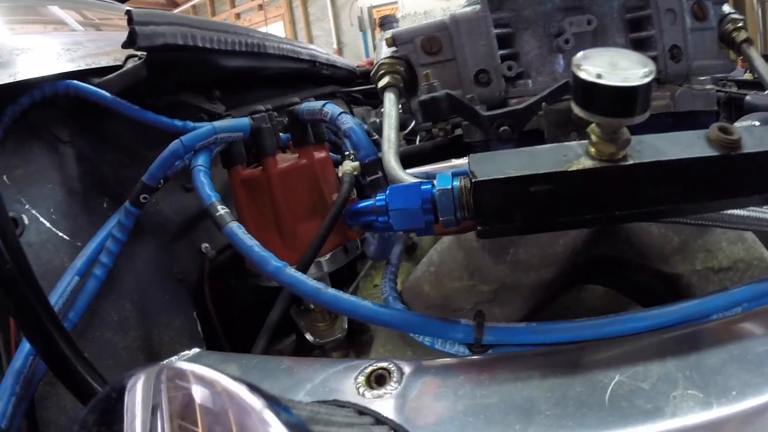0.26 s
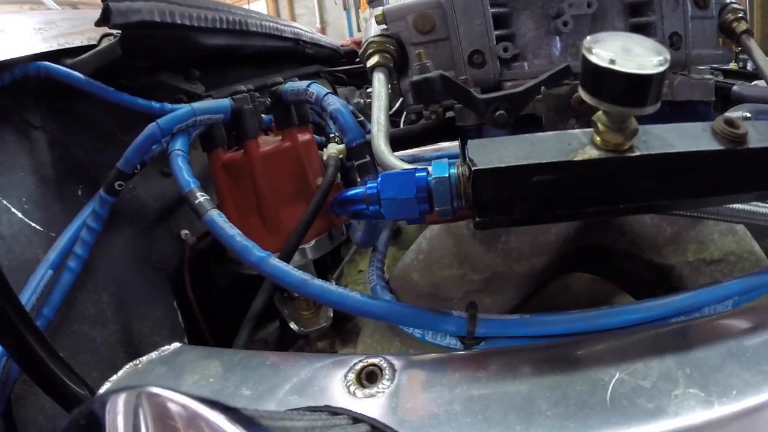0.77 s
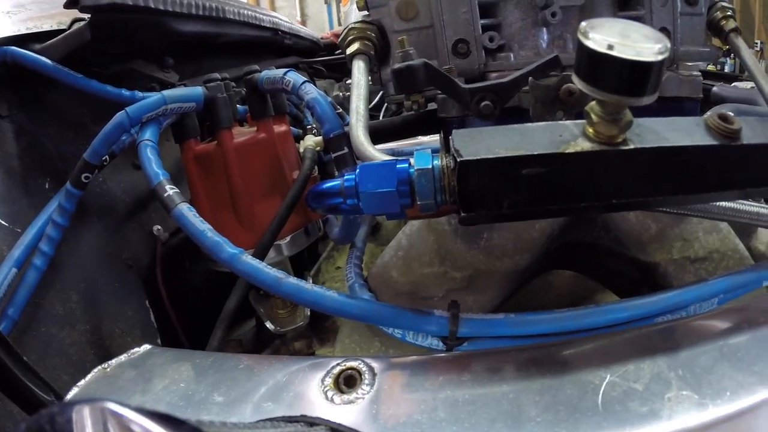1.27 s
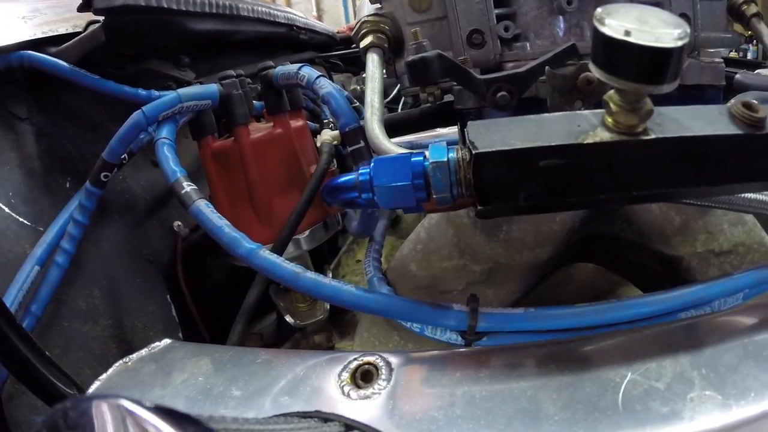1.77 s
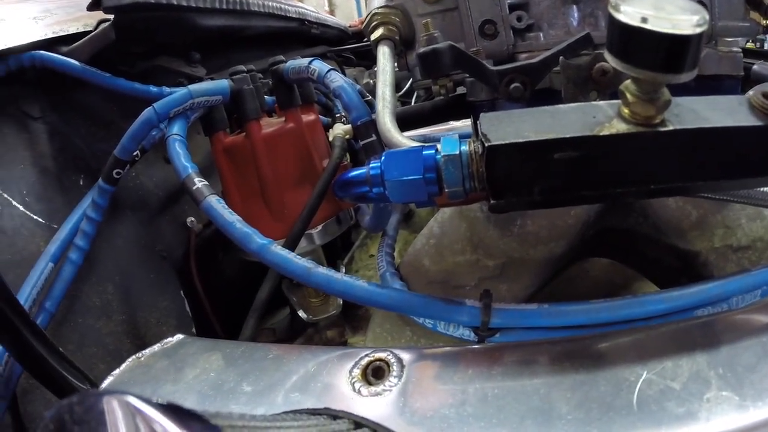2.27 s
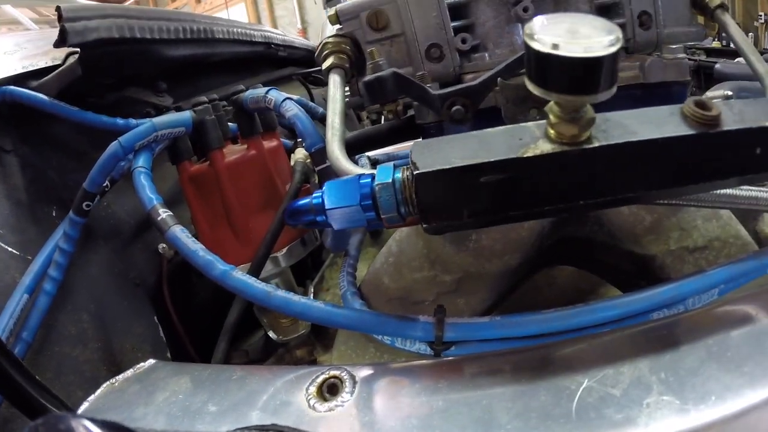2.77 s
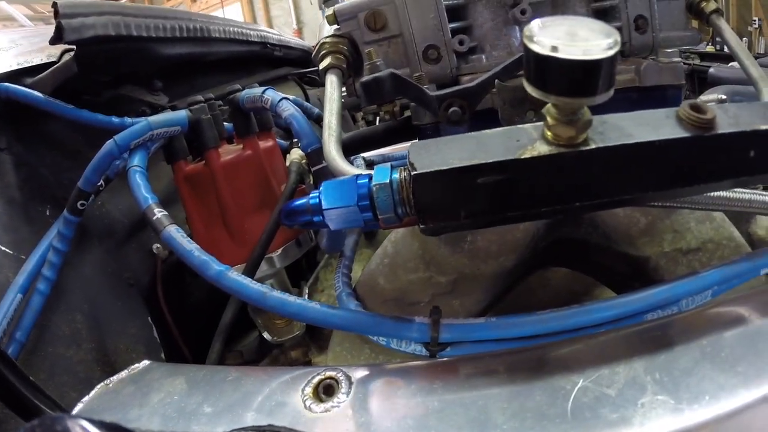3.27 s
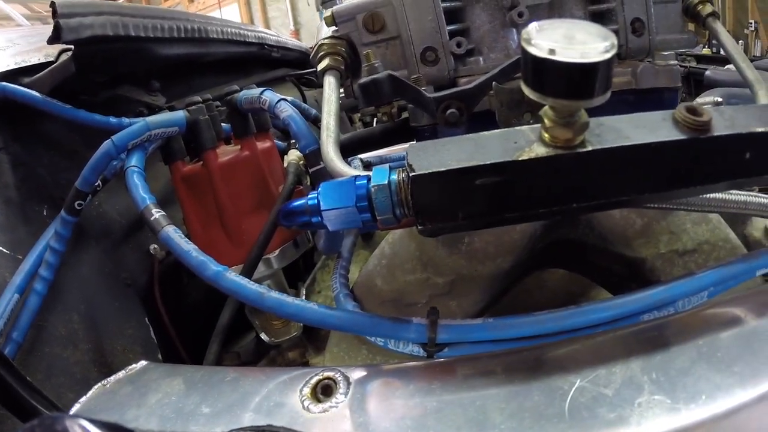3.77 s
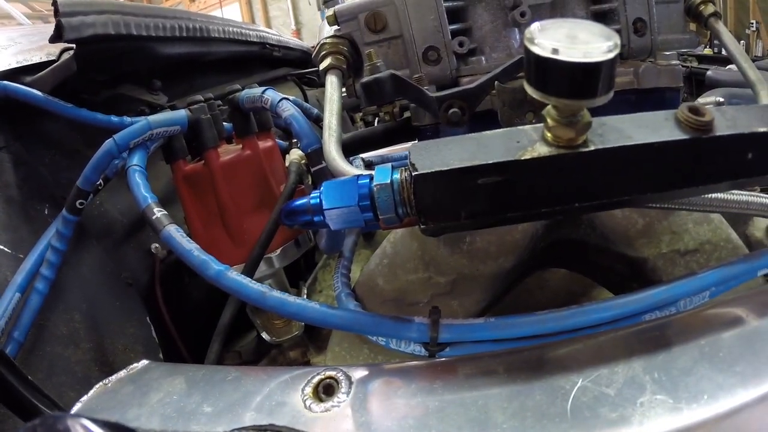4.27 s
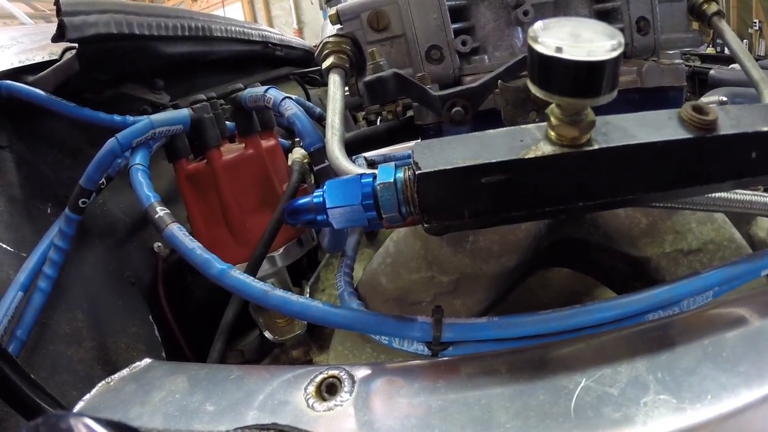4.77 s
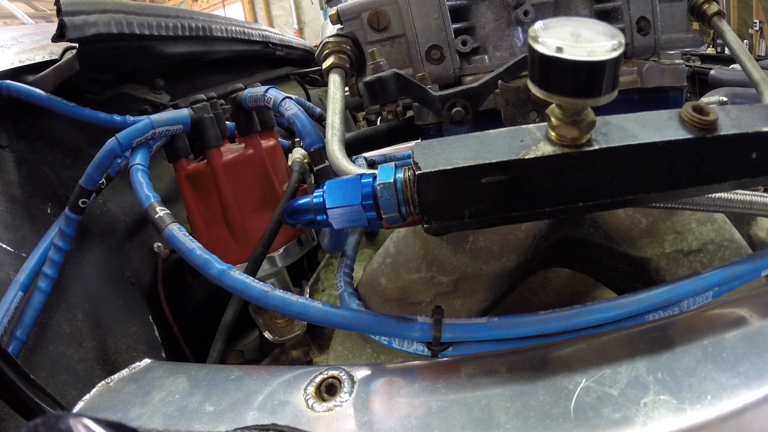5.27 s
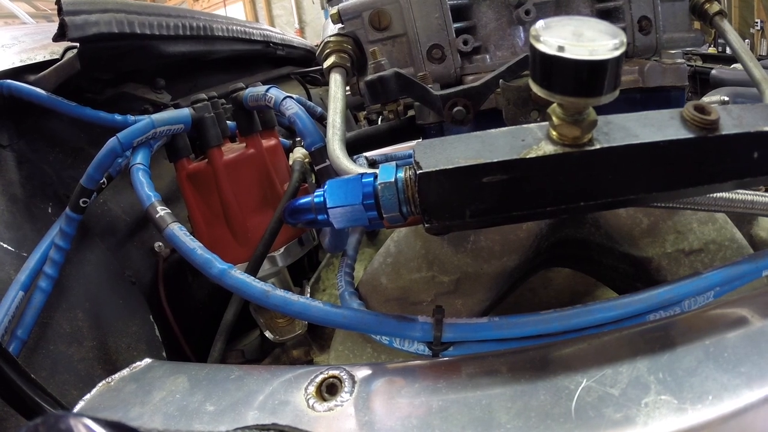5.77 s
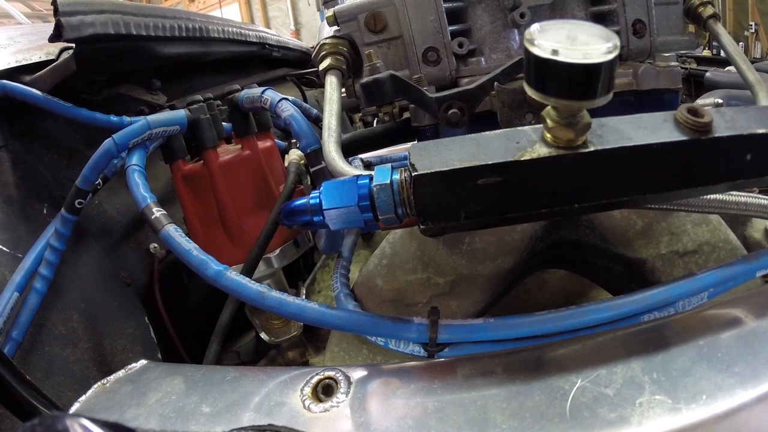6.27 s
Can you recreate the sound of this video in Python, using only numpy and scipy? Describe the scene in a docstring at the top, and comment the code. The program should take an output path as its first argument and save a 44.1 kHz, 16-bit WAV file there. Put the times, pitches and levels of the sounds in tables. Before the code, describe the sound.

An electric fuel pump is already running at the start and continues without a break for about six and a half seconds, heard close over the bay of a stopped car engine. The main sound is a low to mid-pitched hum with a fast throb, constant in pitch and nearly constant in level. A thin, slightly wavering metallic whine and a light buzz sit above it, along with the soft hiss of fuel in the rail. Tiny high metal ticks repeat so quickly that they blend into the buzz. During the first 2.5 seconds the tone changes colour gently as the hand-held microphone moves, with a quicker shift at about 2.5 seconds, after which it stays settled. Underneath, two faint deep drones swell and ebb slightly within the soft rumble of the garage.

```python
"""Fuel pump in a garage

An electric fuel pump runs steadily, heard over the bay of a stopped engine. Its shaft turns
41 times a second and drives a throbbing hum, a thin whine, a buzz and two small ticks a turn,
while fuel hisses in the rail. The colour changes as the hand-held microphone shifts between
three spots. Two faint drones and the rumble of the garage lie underneath."""
import sys
import numpy as np
from scipy import signal
from scipy.fft import rfft, irfft, next_fast_len
from scipy.io import wavfile

SR = 44100
rng = np.random.default_rng(int(sys.argv[2]) if len(sys.argv) > 2 else 0)


def pcm_store(signal):
    """Save signal as 16-bit PCM."""
    levels = np.round(np.clip(np.atleast_2d(signal), -1, 1) * 32767)
    wavfile.write(sys.argv[1], SR, levels.astype(np.int16).T)


N = 287532
TIME = np.arange(N) / SR
SHAFT_HZ = 40.94  # an "order" is a multiple of this speed

# path of the microphone: (time [s], position [spot number, clipped to 0-2])
MIC_PATH = [(0, 0.38), (.45, 0.2), (.9, 0.4), (1.1, 0.61), (2.45, 0.92), (2.7, 3.4), (6.52, 2.54)]
# strong partials that carry the hum, each snapped to the nearest order: (frequency [Hz], level [dB])
HUM_PEAKS = [(161.5, -42.5), (285.3, -41.5), (328.4, -42), (366.1, -49), (452.2, -45), (489.9, -47.5),
             (613.7, -51), (942.1, -55.5), (985.1, -51.5), (1147, -55.5), (1184, -50.5), (1270, -55.5),
             (1308, -48), (1394, -55.5)]
# the bed of weaker hum orders: (frequency [Hz], base level per order [dB])
HUM_BED = [(82, -63), (123, -53), (240, -58.5), (410, -51.5), (550, -65), (900, -61), (1080, -61),
           (1430, -56.5), (1550, -66), (1750, -73)]
# orders that all but cancel in the pump body: (order [multiple of shaft speed])
CANCELLED_ORDERS = [27, 33]
# a ring of the pump mount holds back nearby orders: (frequency [Hz], half width [Hz], delay [turns])
MOUNT_RING = (376.5, 33.5, .42)
# a short echo off the bodywork ripples the hum: delay [s], (depth at spots 0, 1, 2 [dB per kHz])
ECHO_S, ECHO_DB_PER_KHZ = 0.001204, [-0.1, 0.9, -0.76]
# high orders that sing out as the whine: (order [multiple of shaft speed])
WHINE_ORDERS = [50, 54, 56, 62, 65, 75, 78, 81, 85, 95, 96, 103, 109, 111, 113, 124]
# the buzz between and above the whine: (frequency [Hz], base level per order [dB])
BUZZ_SPECTRUM = [(1700, -66), (2100, -73.5), (2400, -78), (3200, -72), (4500, -71.5), (5300, -75.5),
                 (7000, -79), (9000, -87.5), (12000, -90.5)]
# fuel rushing through pump and rail: (frequency [Hz], relative level [dB])
HISS_SPECTRUM = [(150, -8), (260, 2), (550, 0), (780, -6), (1300, -6), (1700, -12), (2400, -12),
                 (4500, -13.5), (5500, -19), (7700, -17.5), (9000, -22.5), (10300, -22), (12500, -30),
                 (15000, -27.5)]
# rings of the rail and its fittings: (frequency [Hz], width [Hz], boost at spots 0, 1, 2 [dB])
RAIL_RINGS = [(3350, 210, 3.5, 4, 1.5), (3880, 99, 5, -6, 2.5), (4550, 400, -7, 7.5, 2.5),
              (4970, 160, 9, -1, 2.5), (5580, 150, 13.5, 8.5, 2.5), (6050, 170, 10, 5, 5),
              (6460, 150, 3, 4.5, 4.5), (6880, 84, 2, 6.5, 11), (7230, 160, 4, 4.4, 0.5),
              (8130, 200, 7, 15.5, 9), (8720, 260, 12, 0, 6), (9500, 130, 8, 1, 9), (9730, 240, 13, 9, 8),
              (10700, 250, 3, 7, 0), (11620, 370, 12, -1, 6), (13500, 280, 4, 9, 7)]
# metal contacts in each turn: (shaft angle [turns], relative level [dB])
TICK_CONTACTS = [(.02, -2.5), (.77, -1.5)]
# the ring of a tick: (frequency [Hz], relative level [dB], time to fade 60 dB [s])
TICK_MODES = [(9600, -2, 0.012), (9750, -1, 0.0095), (10160, 1, 0.0068), (10600, -16, .003),
              (14500, -11, .001)]
# fader moves of the drones: (time [s], level near 56 Hz [dB], level near 83 Hz [dB])
DRONE_LEVELS = [(0.15, -52.5, -56), (1.93, -55.5, -59.5), (3.53, -52, -51.5), (4.21, -55, -61),
                (5.53, -61, -65), (5.58, -57, -62), (6.4, -54, -69)]
# fuzzy low resonances of the garage: (frequency [Hz], width [Hz], level [dB])
ROOM_BOOMS = [(67.1, 1.8, -66), (135.9, 13.3, -52.5), (191.4, 14, -59)]
# garage rumble: (frequency [Hz], relative level [dB])
RUMBLE_SPECTRUM = [(8, -17), (22, -6), (45, -7), (100, -3), (130, -12), (170, 7), (230, -18), (400, -4),
                   (1500, -27)]


def amp(db):
    """Decibels to gain."""
    return 10 ** (np.asarray(db) / 20)


def unit_rms(x):
    """Scales a signal to an rms of 1."""
    return x / np.sqrt(np.mean(x ** 2) + 1e-20)


def automation(rows, column=1):
    """One column of a timed table, interpolated to every sample."""
    rows = np.array(rows)
    return np.interp(TIME, rows[:, 0], rows[:, column])


def spectrum_db(points, hz):
    """The level of an EQ curve at hz, interpolated on a log-frequency axis."""
    point_hz, db = np.transpose(points)
    return np.interp(np.log(hz + 1), np.log(point_hz), db)


def noise(gain):
    """Noise of rms 1, shaped by the function gain(Hz)."""
    size = next_fast_len(N)
    hz = np.fft.rfftfreq(size, 1 / SR)
    return unit_rms(irfft(rfft(rng.standard_normal(size)) * gain(hz), size)[:N])


def drift(rate_hz):
    """A smooth random modulator of rms 1, moving at up to about rate_hz."""
    return noise(lambda hz: 1 / (1 + (hz / rate_hz) ** 4))


def random_phases(count):
    """Phasors of length 1 at random angles."""
    return np.exp(2j * np.pi * rng.random(count))


def wavetable(orders, phasors, turns, size=8192):
    """One turn's vibration, built from its orders and looped at the shaft's angle."""
    spectrum = np.zeros(size // 2 + 1, complex)
    spectrum[orders] = phasors * size / np.sqrt(2)
    one_turn = np.resize(irfft(spectrum), size + 1)
    return np.interp(turns % 1 * size, np.arange(size + 1), one_turn)


def shaft_turns(flutter_hz=.03, wander_hz=.02, start_turns=.015):
    """Shaft angle in turns; the speed is steady but for slight flutter and slow wander under load."""
    speed_hz = SHAFT_HZ + flutter_hz * drift(rate_hz=9) + wander_hz * drift(rate_hz=.7)
    return start_turns + np.cumsum(speed_hz) / SR


def mic_crossfade(spots=3):
    """Each spot's share of the mix as the microphone moves; the shares sum to 1."""
    position = np.clip(automation(MIC_PATH), 0, spots - 1)
    return np.maximum(1 - abs(position - np.arange(spots)[:, None]), 0)


def hum(turns, shares, load_peak_turns=.68, stroke_db=2.5, cancel_db=-12, scatter_db=.76, waver=.023):
    """The low orders swell where the rotor is loaded most; the mounts smear them around the turn."""
    orders = np.arange(2, 44)
    hz = orders * SHAFT_HZ
    db = spectrum_db(HUM_BED, hz) + stroke_db * (orders % 4 == 0)  # four fuel strokes a turn
    db += cancel_db * np.isin(orders, CANCELLED_ORDERS)
    for peak_hz, peak_db in HUM_PEAKS:
        db[orders == round(peak_hz / SHAFT_HZ)] = peak_db
    # the low orders keep a throb, the high ones arrive anywhere in the turn
    smear = np.interp(orders, [12, 20], [.15, .5]) * rng.uniform(-1, 1, len(orders))
    ring_hz, half_width_hz, delay_turns = MOUNT_RING
    mount_lag = delay_turns * np.exp(-((hz - ring_hz) / half_width_hz) ** 2)
    phases = np.exp(-2j * np.pi * np.cumsum(load_peak_turns + mount_lag + smear))
    out = np.zeros(N)
    for share, echo_depth in zip(shares, ECHO_DB_PER_KHZ):
        comb = echo_depth * np.cos(2 * np.pi * hz * ECHO_S)
        # the shorter the wave, the more the spot matters: scatter and comb scale per kHz
        colour_db = hz / 1000 * (scatter_db * rng.standard_normal(len(orders)) - comb)
        out += share * wavetable(orders, amp(db + colour_db) * phases, turns)
    return out * (1 + waver * drift(rate_hz=5))


def whine(turns, shares, order_db=-64.5, scatter_db=1.1, waver=.059):
    """Thin, metallic high orders waver together, their balance a little different at each spot."""
    phases = random_phases(len(WHINE_ORDERS))
    out = np.zeros(N)
    for share in shares:
        db = order_db + scatter_db * rng.standard_normal(len(WHINE_ORDERS))
        out += share * wavetable(WHINE_ORDERS, amp(db) * phases, turns)
    return out * (1 + waver * drift(rate_hz=3.8))


def buzz(turns, shares, scatter_db=(-13, 2.08), steady=.75, waver=.39):
    """Weak, uneven high orders in layers: one for each spot, one steady and two wavering."""
    orders = np.setdiff1d(np.arange(44, 370), WHINE_ORDERS)
    out = np.zeros(N)
    for fader in (*np.sqrt(shares), steady, waver * drift(rate_hz=3.6), waver * drift(rate_hz=17)):
        db = spectrum_db(BUZZ_SPECTRUM, orders * SHAFT_HZ) + rng.uniform(*scatter_db, len(orders))
        out += fader * wavetable(orders, amp(db) * random_phases(len(orders)), turns)
    return out


def fuel_hiss(turns, level_db=-47.5, split_hz=6000, surge_depth=.17, surge_peak_turns=.87, grain=.26):
    """Fuel hisses through the pump; the treble surges once a turn and is chopped by the rotor."""
    rush = amp(level_db) * noise(lambda hz: amp(spectrum_db(HISS_SPECTRUM, hz)))
    body = signal.sosfiltfilt(signal.butter(2, split_hz, fs=SR, output="sos"), rush)
    treble = rush - body
    surge = np.cos(2 * np.pi * (turns - surge_peak_turns))
    chop_orders = np.arange(16, 48)
    chop = unit_rms(wavetable(chop_orders, random_phases(len(chop_orders)), turns))
    return body + treble * (1 + surge_depth * surge + grain * chop)


def rail_colour(x, shares, ripple_db=2.0, longest_s=.008, echoes=12):
    """The rail's rings and short echoes off nearby metal give each spot its own EQ."""
    size = next_fast_len(N)
    hz, spectrum = np.fft.rfftfreq(size, 1 / SR), rfft(x, size)
    out = np.zeros(N)
    for spot, share in enumerate(shares):
        rings_db = sum(boost_db[spot] * 0.5 ** ((2 * (hz - centre) / width) ** 2)
                       for centre, width, *boost_db in RAIL_RINGS)
        delays_s = longest_s * rng.uniform(.2, 1, echoes)
        comb = unit_rms(sum(np.cos(2 * np.pi * hz * delay) for delay in delays_s))
        comb_db = ripple_db * comb * hz / (hz + 3000)  # deepest in the treble
        out += share * irfft(spectrum * amp(rings_db + comb_db), size)[:N]
    return out


def ticks(turns, level_db=-60, uneven_db=1.5, jitter_turns=.002, scrape=.07, scrape_s=.00076):
    """Two small metal contacts a turn, never quite alike, scrape briefly and ring in the high treble."""
    blows = np.zeros(N)
    for angle, db in TICK_CONTACTS:
        laps = np.floor(turns - angle + jitter_turns * drift(rate_hz=40))
        hits = np.flatnonzero(np.diff(laps) > 0)
        blows[hits] += amp(db + uneven_db * rng.standard_normal(N)[hits])
    t = TIME[:SR // 20]
    scrape_envelope = signal.oaconvolve(blows, np.exp(-t / scrape_s))[:N]
    force = blows + scrape * scrape_envelope * rng.standard_normal(N)
    ring = sum(amp(db - 60 * t / t60) * np.sin(2 * np.pi * hz * t) for hz, db, t60 in TICK_MODES)
    attack = 1 - np.exp(-t / .00023)
    return amp(level_db) * unit_rms(signal.oaconvolve(force, ring * attack)[:N])


def mic_tremble(x, depth=.08, longest_s=.004, echoes=6):
    """The hand-held microphone trembles, so short echoes in the treble come and go."""
    treble = signal.sosfilt(signal.butter(2, 3000, "high", fs=SR, output="sos"), x)
    delays = (longest_s * SR * rng.uniform(.1, 1, echoes)).astype(int)
    return x + depth * sum(drift(rate_hz=3.8) * np.roll(treble, delay) for delay in delays)


def drone(hz, wander_hz):
    """A sine of rms 1 whose pitch wanders slowly."""
    pitch_hz = hz + wander_hz * drift(rate_hz=1)
    return np.sqrt(2) * np.sin(2 * np.pi * np.cumsum(pitch_hz) / SR)


def garage(rumble_db=-57):
    """Room tone: two low drones, a few booming resonances and a soft rumble."""
    low_drone = amp(automation(DRONE_LEVELS, column=1)) * drone(55.85, wander_hz=.1)
    high_drone = amp(automation(DRONE_LEVELS, column=2)) * drone(83.3, wander_hz=.93)
    boom = sum(amp(db) * noise(lambda hz: 1 / (1 + (2 * (hz - centre) / width) ** 4))
               for centre, width, db in ROOM_BOOMS)
    rumble = amp(rumble_db) * noise(lambda hz: amp(spectrum_db(RUMBLE_SPECTRUM, hz)))
    return low_drone + high_drone + boom + rumble


def scene():
    """The mono mix: one shaft drives every layer of the pump, over the room tone."""
    turns, shares = shaft_turns(), mic_crossfade()
    tones = hum(turns, shares) + whine(turns, shares)
    sizzle = rail_colour(buzz(turns, shares) + fuel_hiss(turns), shares)
    texture = mic_tremble(sizzle + ticks(turns))
    return (tones + texture + garage())[None]


def record(dry):
    """A steep low-pass takes off the air above about 15 kHz."""
    lowpass = signal.firwin(1023, cutoff=15270, window=("kaiser", 9), fs=SR)
    return signal.oaconvolve(dry, lowpass[None], "same")


dry = scene()
out = record(dry)
pcm_store(out)
```